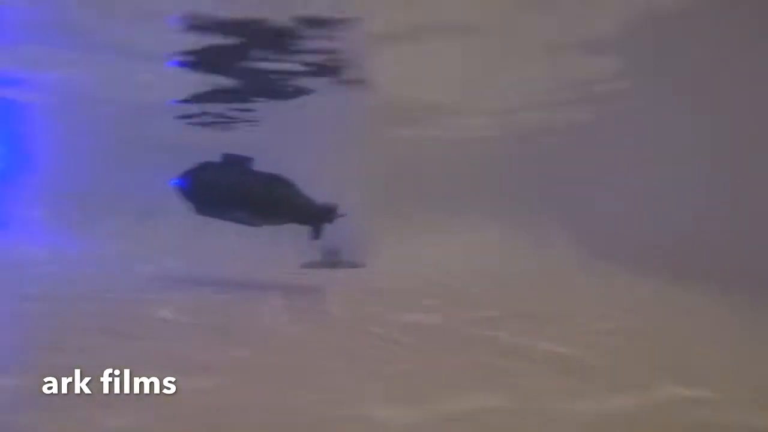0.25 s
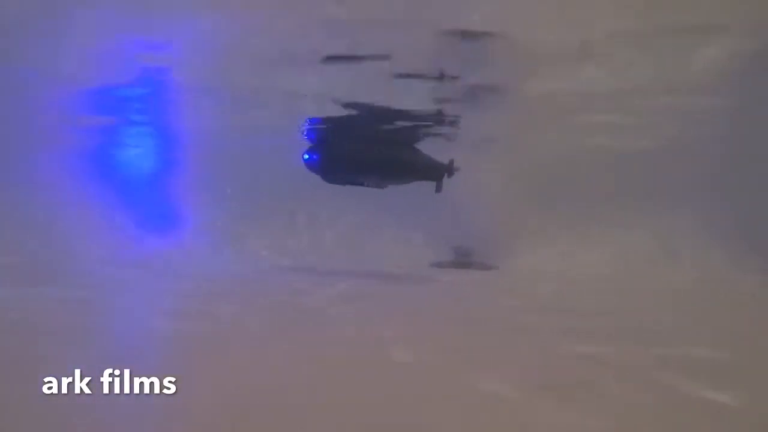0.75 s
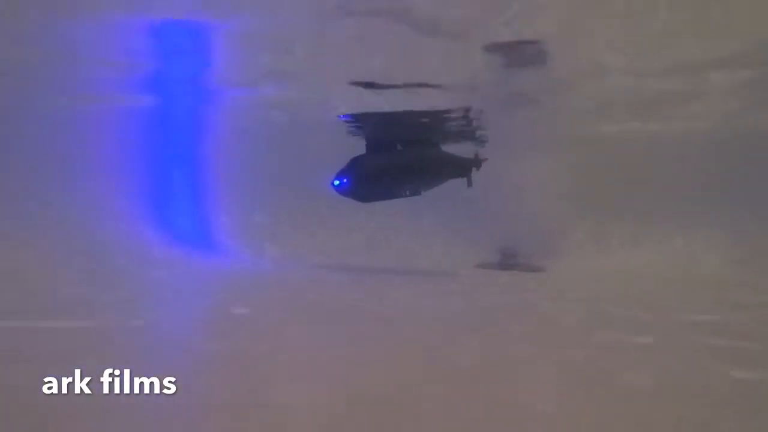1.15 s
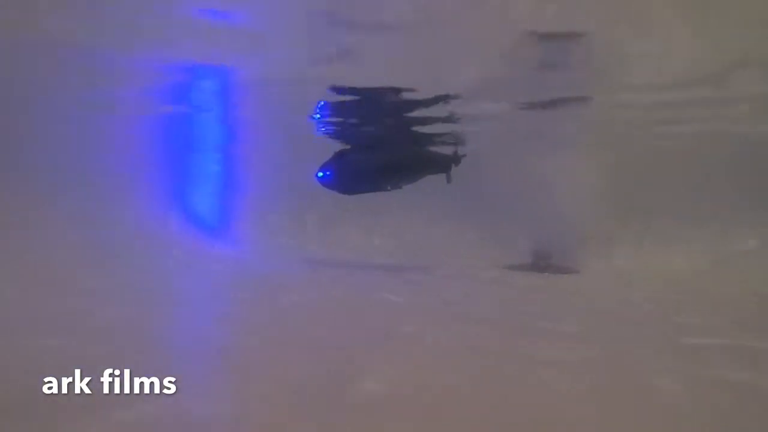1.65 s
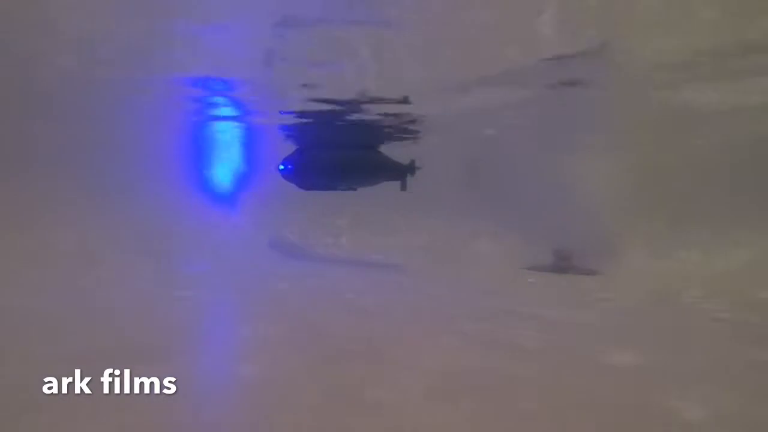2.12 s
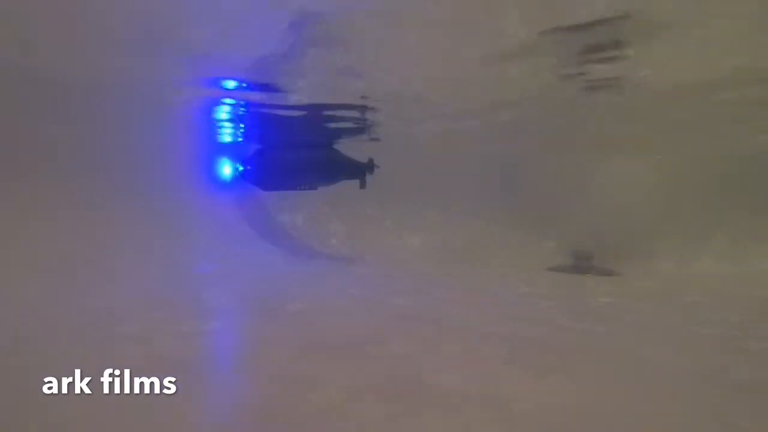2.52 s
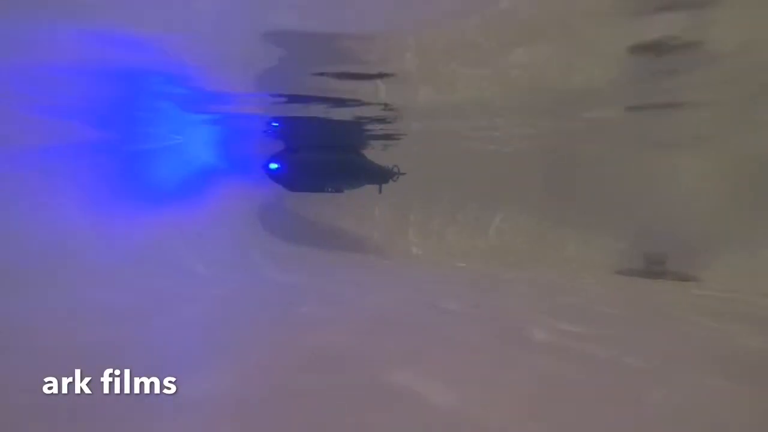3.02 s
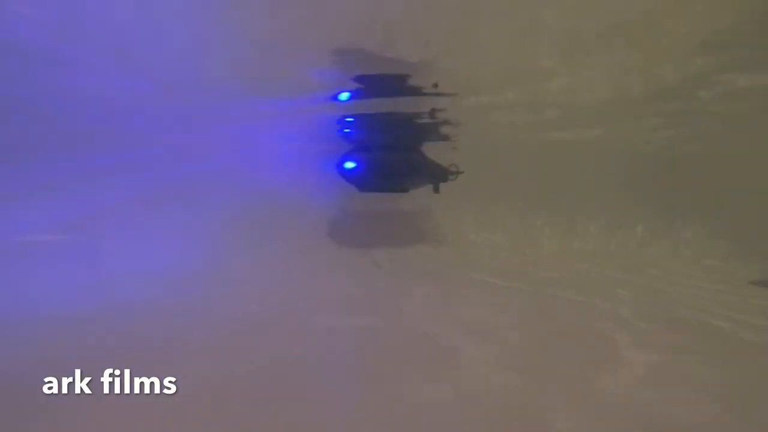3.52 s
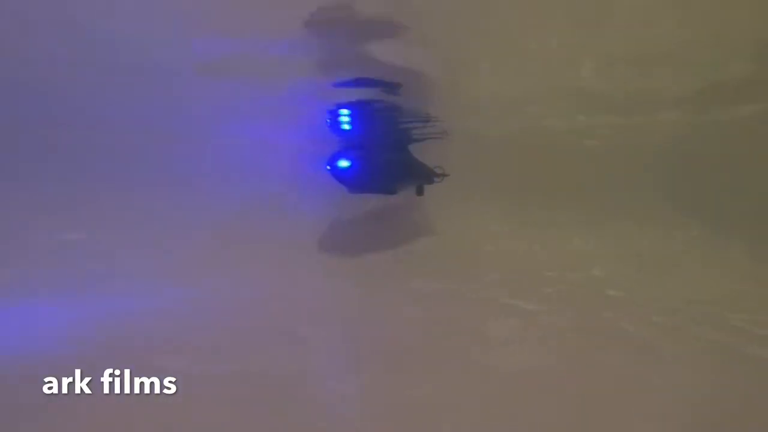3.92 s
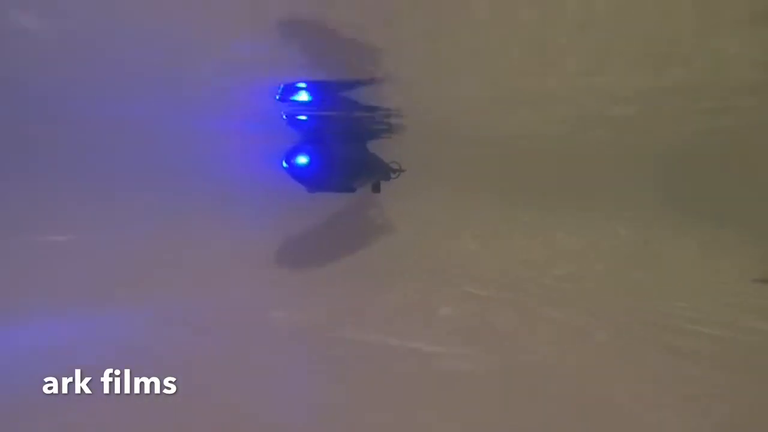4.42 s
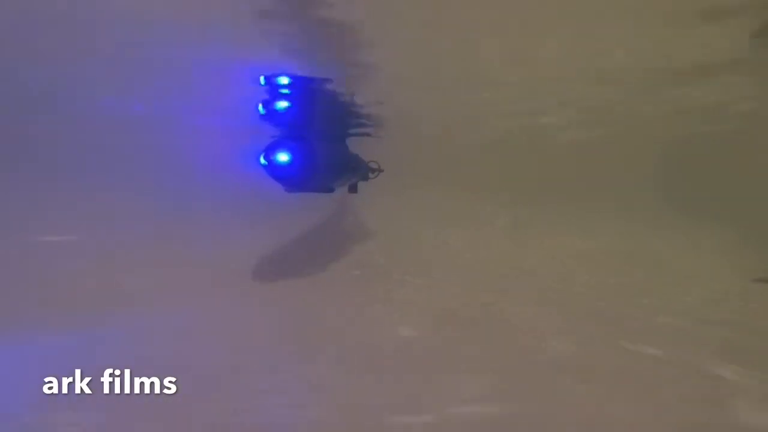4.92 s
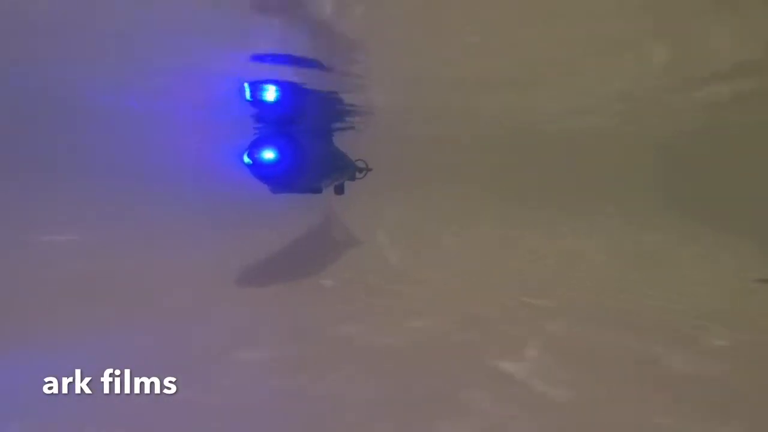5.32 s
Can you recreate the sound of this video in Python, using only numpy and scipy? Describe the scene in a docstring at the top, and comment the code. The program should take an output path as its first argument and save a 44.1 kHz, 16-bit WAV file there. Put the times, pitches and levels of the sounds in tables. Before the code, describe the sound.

Heard from inside a watertight case under a pool's surface, air escapes in a busy gurgle: rising chirps, round pops, dry crackles and soft fizz. After about a second and a half the bubbles stop, leaving murky churning water, low glugs from slapping waves, tiny drips, and the low, uneven hum of a toy submarine's motor.

```python
"""Bubbles around a toy submarine

A toy submarine hums through a swimming pool, heard by two microphones in a watertight case.
Most air bubbles break loose early, right at the case: gliding rings chirp, short rings pop,
and brief noise bursts crackle and fizz. Then coloured noise churns and low rings glug around
the motor, a stack of wavering sine tones. Small drips and thin, very high ticks lie behind."""
import sys
import numpy as np
from scipy import signal
from scipy.fft import rfft, irfft, next_fast_len
from scipy.io import wavfile
from scipy.ndimage import uniform_filter1d, map_coordinates

SR = 44100
rng = np.random.default_rng(int(sys.argv[2]) if len(sys.argv) > 2 else 0)


def master_out(mix):
    """Clip the mix to full scale and print it as 16-bit PCM to the path in sys.argv[1]."""
    frames = np.transpose(np.atleast_2d(mix))
    ceiling = np.clip(frames, -1, 1)
    pcm = np.round(ceiling * 32767).astype(np.int16)
    wavfile.write(sys.argv[1], SR, pcm)


N = 244755
TIME = np.arange(N) / SR
ESCAPE_S = 1.44  # how long air escapes

# bubbles that pinch off and ring briefly: t/s, f/Hz, level/dB
POP_EVENTS = [(0.017, 2570, -29.5), (.062, 1350, -17), (.082, 456, -7.5), (0.099, 1210, -6),
              (0.1483, 993, -5), (.149, 2970, -28), (.198, 2570, -23), (.377, 740, -11.5),
              (0.4315, 967, -16.5), (.433, 2160, -23), (0.521, 1610, -18), (0.612, 1680, -26.5),
              (.63, 604, -11), (.655, 2640, -25), (.678, 496, -10.5), (0.878, 510, -9.5), (0.89, 3000, -24),
              (1.015, 394, -9.5), (1.018, 1470, -21), (1.05, 3270, -17.5), (1.091, 2400, -33),
              (1.311, 3240, -28.5), (1.312, 2250, -30.5), (1.359, 744, -11), (1.36, 2390, -20.5),
              (1.394, 1350, -25)]
# waves slapping in the pool: t/s, level/dB, f/Hz, length of the wash/s, push on the case/dB
WAVES = [(.276, -8, 225, 0.016, -30), (0.299, -20.5, 198, 0.13, -27), (0.431, -9, 267, 0.11, -33),
         (.586, -8, 604, 0.06, -34), (.98, -11.5, 400, 0.085, -31), (1.107, -16.5, 527, 0.035, -49),
         (1.285, -12, 440, 0.064, -36), (1.41, -10, 604, 0.011, -43), (1.633, -13.5, 335, 0.016, -40),
         (1.994, -15, 647, 0.022, -35.5), (2.197, -13, 327, 0.034, -34.5), (2.293, -13.5, 605, 0.011, -29),
         (2.366, -18.5, 293, 0.019, -31), (2.544, -9.5, 535, 0.012, -33), (2.613, -15.5, 398, 0.015, -33),
         (2.74, -14, 432, 0.012, -40), (2.78, -9.5, 578, 0.06, -35), (2.984, -18, 271, 0.041, -39),
         (3.182, -15.5, 410, 0.037, -25.5), (3.285, -5.5, 307, 0.091, -36.5),
         (3.456, -22, 351, 0.09, -29.5), (3.488, -18, 650, .012, -40), (3.626, -13.5, 583, 0.017, -29.5),
         (3.775, -15, 692, 0.028, -36), (3.814, -19.5, 187, 0.14, -39), (3.984, -15, 587, 0.022, -34),
         (4.088, -16, 219, 0.028, -42.5), (4.213, -17.5, 197.4, 0.0072, -34), (4.25, -16, 586, 0.027, -34),
         (4.508, -14, 200, 0.088, -29), (4.617, -15.5, 433, .05, -38), (4.892, -12.5, 646, 0.12, -46),
         (5.093, -9, 612, 0.02, -32.5), (5.215, -14, 478, 0.02, -39), (5.414, -12.5, 580, 0.041, -30)]


def chirps(count=3):
    """Bubbles sing out one by one; each sheds smaller ones that sound beside it, off in pitch."""
    # gliding bubbles; the large late ones are low gulps: t/s, length/s, start f/Hz, end f/Hz, level/dB
    singing = [(0.072, 0.029, 640, 1242, -8.5), (.108, 0.034, 590, 1044, -23),
               (0.11, 0.041, 978, 1540, -27), (.169, 0.079, 274, 844, -7.5), (0.195, 0.028, 873, 1220, -30),
               (0.197, 0.011, 2540, 3540, -34), (0.246, 0.022, 960, 1300, -21),
               (0.375, 0.032, 747, 1200, -11.5), (0.403, 0.016, 1110, 1360, -19),
               (0.422, 0.01, 1190, 1630, -10.5), (0.432, 0.009, 1590, 2350, -29),
               (0.45, 0.01, 2300, 4250, -38), (0.467, 0.017, 1097, 1550, -20),
               (0.485, 0.068, 181.5, 221, -18), (0.635, 0.024, 545, 643, -11),
               (0.649, 0.015, 1000, 1500, -21), (0.68, 0.011, 2380, 3380, -25),
               (0.676, 0.071, 351, 894, -9), (0.681, 0.028, 716, 1356, -13),
               (0.704, 0.038, 1254, 1570, -15.5), (0.741, 0.024, 863, 1150, -18),
               (0.882, 0.083, 293.5, 943, -8.5), (0.971, 0.016, 974, 1350, -18),
               (1.018, 0.017, 777, 1734, -5.5), (1.04, 0.011, 1686, 3030, -26.5),
               (1.031, 0.05, 356, 707, -13.5), (1.034, 0.016, 1160, 1370, -19.5),
               (1.035, 0.018, 1510, 1660, -23.5), (1.051, 0.036, 1606, 1370, -25),
               (1.064, 0.01, 764, 1350, -14.5), (1.069, 0.018, 1253, 1494, -19.5),
               (1.224, 0.054, 668, 1183, -26), (1.299, 0.025, 512, 820, -13),
               (1.306, 0.013, 1400, 1530, -27.5), (1.321, 0.031, 448, 696, -9),
               (1.327, 0.021, 977, 1356, -5.5), (1.362, 0.035, 756, 952, -18),
               (1.424, .01, 1020, 1344, -13.5), (2.194, 0.031, 337, 390, -14.5),
               (2.299, 0.022, 660, 570, -19.5), (2.55, 0.019, 598, 558, -20), (2.604, 0.033, 508, 541, -18),
               (2.656, 0.027, 498, 553, -21), (2.77, 0.023, 540, 615, -17), (3.29, 0.018, 385, 323, -16.5),
               (3.3, 0.029, 178, 204, -21), (3.314, 0.039, 80, 90, -16), (3.392, 0.018, 603, 656, -19),
               (3.655, 0.02, 608, 634, -19), (3.682, 0.022, 656, 668, -15.5),
               (3.809, 0.04, 173.7, 194, -19.5), (3.965, 0.034, 434, 636, -20.5),
               (4.266, 0.024, 630, 670, -22.5), (4.857, 0.019, 636, 653, -17),
               (4.933, 0.042, 651, 610, -18.5), (4.983, 0.021, 605, 628, -20.5),
               (5.035, 0.027, 617, 650, -19)]
    split_db, split_ratio, split_s = -16.5, 1.5, 0.014  # shed bubble: top level, pitch spread, length
    out = np.zeros(N)
    for s, length, start_hz, end_hz, db in singing:
        add(out, s, amp(db) * glide(length, start_hz, end_hz))
        glide_ratio = end_hz / start_hz
        for when, detune in rng.random((count, 2)):
            hz = start_hz * glide_ratio ** when * split_ratio ** (1.506 * detune - 0.5)
            shed = glide(split_s, hz, hz * glide_ratio ** 0.3)
            add(out, s + 0.7 * when * length, amp(db + split_db - 11 * detune) * shed)
    return out


def pops():
    """Bubbles close by ring briefly, each set off by a wet snap of noise."""
    out = np.zeros(N)
    for s, hz, db in POP_EVENTS:
        add(out, s, amp(db) * bubble(hz, cycles=9 + hz / 80, rise=0.31))
        add(out, s, amp(db - 14.5) * puff(hz, ratio=1.35, t60=0.046))
        add(out, s, amp(db - 27) * puff(2200, ratio=1.8, t60=0.0045))
    return out


def gurgle(count=280):
    """Lesser bubbles plip and chirp around the pops; the small ones are higher and weaker."""
    lead_s, trail_s = 0.002, 0.045  # the froth gathers from just before a pop until a while after it
    out = np.zeros(N)
    for which, when, size, strength, kind in rng.random((count, 5)):
        pop_s = POP_EVENTS[int(which * len(POP_EVENTS))][0]
        s = pop_s - lead_s + (lead_s + trail_s) * when ** 1.5
        hz = 650 * 5 ** size
        if kind < 0.85:
            plip = bubble(hz, cycles=16 + hz / 130, rise=0.078)
        else:
            plip = glide(0.0097, hz, 1.17 * hz)
        add(out, s, amp(-24.5 - 12.3 * size - 16.0 * strength) * plip)
    return out


def gushes(count=420):
    """A cloud of very small rising bubbles swells and thins out, and shoves the water at the case."""
    # gushes of fine air hissing out: t/s, length/s, level/dB
    gush_rows = [(0.206, 0.21, -33), (0.271, 0.098, -36.5), (0.369, 0.13, -41.5), (0.498, 0.14, -45.5),
                 (0.675, 0.03, -41), (1.01, 0.029, -40)]
    # colour of the fizz: f/Hz, level/dB
    fizz_colour = [(500, -20), (900, 7), (1600, 7), (2000, -0.5), (2900, 3), (3300, -9.5), (4200, -19),
                   (6000, -30), (15000, -52.5)]
    # colour of the shove: f/Hz, level/dB
    shove_colour = [(15, -12.5), (55, 13), (90, -5), (150, -9.5), (260, -10.5), (600, -34), (2000, -120)]
    air, cloud = np.zeros(N), np.zeros(N)
    for s, length, db in gush_rows:
        add(air, s, amp(db) * signal.windows.tukey(int(length * SR), 0.7))
    for when, size in rng.random((count, 2)):
        hz = 1200 * 2.45 ** size
        add(cloud, when * ESCAPE_S, amp(-3 - 6 * size) * glide(0.011, hz, 1.14 * hz))
    fizz = amp(-4.0) * coloured(sparks(rate=3300, spread_db=4.5), fizz_colour)
    shove = amp(6.0) * coloured(rng.standard_normal(N), shove_colour)
    return air * (fizz + cloud + shove)


def crackle(count=380, spatter_count=2):
    """Tiny bubbles burst on the case: a dry crack, a brief wet ring, and a spatter after the listed ones."""
    # the listed bursts: t/s, level/dB, f/Hz
    bursts = [(0.0172, -27, 4560), (0.062, -37, 3470), (.0775, -31, 8670), (.0902, -41, 3450),
              (.176, -32, 4100), (0.2389, -32.5, 4570), (.325, -30, 5870), (.34, -33.5, 8660),
              (.3576, -38, 4260), (.378, -34.5, 4600), (0.4168, -33.5, 4240), (0.433, -35.5, 6100),
              (0.4792, -26.5, 7000), (0.5524, -37.5, 6140), (0.6522, -34, 4120), (0.6894, -22, 4800),
              (0.7, -24, 5770), (.8006, -37, 5520), (0.912, -36, 7150), (.9433, -30.5, 4520),
              (1.0425, -36.5, 7700), (1.0509, -22, 5200), (1.0616, -26.5, 4460), (1.0894, -30, 4560),
              (1.1214, -37.5, 6000), (1.1438, -39, 6460), (1.2236, -33, 8600), (1.2441, -33.5, 4680),
              (1.2615, -30.5, 9900), (1.27, -25, 4330), (1.3078, -30.5, 6180), (1.323, -31, 7440),
              (1.4255, -40.5, 5490), (1.8781, -44.5, 3910), (2.6398, -45, 5130), (4.4092, -46, 6500),
              (4.4676, -48.5, 3640), (5.215, -44, 4830)]
    # colour of all the bursts: f/Hz, level/dB
    burst_colour = [(600, -17), (1500, 10), (3000, 11), (4500, 2.5), (6000, 4), (8000, 1.5), (11000, -2),
                    (15500, -13.5)]
    weakest_db, range_db = -55.5, 17.5  # random bursts while the air escapes
    spatter_s, spatter_db = 0.024, -12  # smaller bubbles burst within this time, at most this strong
    out = np.zeros(N)
    weak = [(ESCAPE_S * when, weakest_db + range_db * size ** 2, 3100 * 3.7 ** pitch)
            for when, size, pitch in rng.random((count, 3))]
    for s, db, hz in list(bursts) + weak:
        add(out, s + 0.0011, amp(db - 4.5) * puff(1.4 * hz, ratio=3.6, t60=0.0046))
        add(out, s + 0.001, amp(db - 9.0) * bubble(hz, cycles=63, rise=0.12))
        add(out, s + 0.0026, amp(db - 20) * puff(4200, ratio=2.0, t60=0.031))
    for s, db, hz in bursts:
        for late, detune in rng.random((spatter_count, 2)):
            droplet = puff(1.1 * hz * 2 ** (detune - 0.5), ratio=1.5, t60=0.009)
            add(out, s + spatter_s * late, amp(db + spatter_db - 6 * late) * droplet)
    return filtered(out, lambda hz: amp(along(burst_colour, hz)))


def pool(x):
    """The surface and the walls send the bubbles back as a short, dull tail."""
    tail = puff(790, ratio=1.94, t60=0.12)
    delayed = np.pad(tail, (SR // 250, 0))  # 4 ms late
    return signal.fftconvolve(x, delayed / np.abs(rfft(tail)).max())[:N]


def glugs(count=3):
    """A wave slaps a few times quickly, rings low, and rolls briefly between the pool's walls."""
    slosh_s, loss_db = 0.007, 6.5  # it slaps again after about this long, weaker each time
    out = np.zeros(N)
    for s, db, hz, _, _ in WAVES:
        add(out, s + 0.0019, amp(db - 2) * bubble(hz, cycles=4 + hz / 90, rise=0.17))
        for k, (late, detune) in enumerate(rng.uniform(-1.05, 1, (count, 2)), 1):
            slap = bubble(hz * 1.29 ** detune, cycles=9.6, rise=0.18)
            add(out, s + 0.00204 + slosh_s * (k + 0.37 * late), amp(db - loss_db * k) * slap)
        add(out, s + 0.00426, amp(db - 19.5) * puff(hz, ratio=1.9, t60=0.073))
    return filtered(out, lambda hz: 1 / (1 + (hz / 1050) ** 8))


def pushes():
    """While its wash lasts and a little after, each wave leans on the case with a low rumble."""
    # colour of the push: f/Hz, level/dB
    push_colour = [(12, -13.5), (30, -7), (75, 3), (120, -3), (200, -2.5), (400, -25), (1000, -94)]
    force = np.zeros(N)
    for s, _, _, length, push_db in WAVES:
        add(force, s, amp(push_db) * swell(attack_s=0.021, hold_s=length, t60=0.21))
    return force * coloured(rng.standard_normal(N), push_colour)


def flow():
    """How hard the water moves, in dB: a slowly varying stir, and a wash that grows with each wave's slap."""
    # stir of the water under the waves, before the offset below: t/s, level/dB
    stir = [(0.0, -25.5), (0.15, -22.5), (0.28, -25.5), (0.65, -23.5), (1.74, -28), (2.67, -25.5),
            (2.83, -29), (3.06, -26), (3.36, -26), (3.88, -28.5), (4.06, -30.5), (4.3, -26.5), (5.09, -29),
            (5.24, -29.5), (5.55, -27)]
    stir_offset_db = -1.53
    wash_db, middling_db = -26, -12  # the wash of a middling wave, and the slap level of such a wave
    wash_grows = 0.078  # dB of wash per dB of slap
    stir_db, = curves(stir)
    power = amp(stir_db + stir_offset_db) ** 2
    for s, db, _, length, _ in WAVES:
        wash = amp(wash_db + wash_grows * (db - middling_db)) * swell(0.0043, length, t60=0.12)
        add(power, s, wash ** 2)
    return 10 * np.log10(power)


def water():
    """Flow is a deep surge, a churn of countless soft bubbles and a thin fizz, over a steady hiss."""
    # colours of the four layers, each: f/Hz, level/dB
    surge_colour = [(12, -18.5), (29, 2.5), (45, -5.5), (70, -2), (105, 5.5), (140, -2), (180, 8),
                    (230, -1), (300, -6), (600, -61.5), (2000, -120)]
    churn_colour = [(130, -62.5), (250, 0.5), (420, 0), (470, -0.5), (520, 0.5), (650, 2), (760, -5),
                    (930, -9.5), (1020, -13.5), (1130, -38), (1600, -54.5), (3000, -65.5)]
    fizz_colour = [(600, -5.5), (1150, 7), (1500, 9), (1740, 12), (1900, 3.5), (2300, -0.5), (2800, 2),
                   (3500, -9), (3900, -14), (4400, -26.5), (7000, -37), (15500, -62.5)]
    hiss_colour = [(2000, 0), (4500, 1.5), (7000, -1), (9500, -10), (13500, -13), (15500, -36.5)]
    # fine bubbles in the water, before the fizz offset: t/s, level/dB
    foam = [(0.0, -49), (0.31, -48.5), (0.76, -50), (1.76, -53), (3.51, -48.5), (3.97, -52), (4.71, -50.5),
            (5.55, -51.5)]
    surge_db, churn_db, fizz_db = -4, -0.37, 5.5  # surge and churn against the flow, fizz against foam
    flow_db = flow()
    foam_db, = curves(foam)
    mean_db = flow_db.mean()
    stirring_db = flow_db - uniform_filter1d(flow_db, SR // 2)  # a harder churn also fizzes more
    lapping = wobble(45)

    surge_level = mean_db + surge_db + (flow_db - mean_db) + 1.4 * lapping + 1.9 * wobble(13)
    surge = coloured(rng.standard_normal(N), surge_colour) * amp(surge_level)
    soft_bubbles = coloured(sparks(rate=1500, spread_db=1.5), churn_colour)
    churn = lumpy(soft_bubbles, depth_db=3, size=512) * amp(flow_db + churn_db + 1.2 * lapping)
    fine_bubbles = coloured(sparks(rate=4000, spread_db=0.5), fizz_colour)
    fizz_level = foam_db + fizz_db + 0.4 * stirring_db + 0.8 * lapping + wobble(70)
    fizz = lumpy(fine_bubbles, depth_db=4, size=256) * amp(fizz_level)
    hiss = amp(-67.0) * coloured(rng.standard_normal(N), hiss_colour)
    return surge + churn + fizz + hiss


def standing(x):
    """Standing waves of the pool and the case lift a few low pitches above the rest."""
    # resonances: f/Hz, width/Hz, boost/dB
    resonances = [(248.2, 27, 5.5), (295, 16, 6), (359.5, 25, 5), (425, 33.5, 7), (517, 49, 4.5)]
    floor = [(200, 1), (235, -4.5), (570, -2.5), (620, 0)]  # level between them: f/Hz, level/dB

    def response(hz):
        peaks_db = sum(db / (1 + (2 * (hz - centre) / width) ** 2) for centre, width, db in resonances)
        return amp(along(floor, hz) + peaks_db)
    return filtered(x, response)


def motor():
    """The shaft turns a little unevenly; ripples overhead make each of its orders fade in and out."""
    # tones of the shaft, before the fading: multiple of the shaft rate, level/dB
    orders = [(1, -35), (2, -33), (3, -40.5), (4, -54)]
    shaft_hz = 94.8 * (1 + 0.01192 * wobble(5) + 0.0296 * wobble(35))
    phase = 2 * np.pi * np.cumsum(shaft_hz) / SR
    hum = np.zeros(N)
    for order, db in orders:
        hum += amp(db - 4 + 2.9 * np.tanh(wobble(9.9))) * np.sin(order * phase)
    # the gears rattle a resonance of the hull, whose pitch wanders as the water moves around it
    rattle = unit(filtered(rng.standard_normal(N), lambda hz: 1 / (1 + (hz / 32) ** 2)))
    hull_hz = 635 * (1 + 0.04 * wobble(12))
    hull = rattle * np.sin(2 * np.pi * np.cumsum(hull_hz) / SR)
    nearness_db = np.interp(TIME, [1.5, 3.8], [-2.5, 1])  # the boat turns towards the microphones
    return amp(nearness_db) * (hum + amp(-35 + 2.9 * wobble(14)) * hull)


def drips(count=130):
    """Small drips far off, each a snap and a short ring with a damp tail, among many fainter ones."""
    # the clearer drips: t/s, level/dB, f/Hz
    clear_drips = [(1.671, -32.5, 2580), (2.2, -24.5, 1620), (2.37, -26, 1560), (2.783, -29, 1760),
                   (3.186, -22, 1350), (3.312, -32, 1750), (3.53, -30, 1650), (3.531, -32, 2840),
                   (3.783, -24.5, 1400), (3.788, -30, 1790), (3.898, -25, 1300), (4.124, -23.5, 1870),
                   (4.4676, -26.5, 3240), (4.659, -33, 1600), (4.892, -29.5, 2010), (5.058, -30, 2650),
                   (5.2224, -26.5, 2800), (5.408, -28, 1910)]
    out = np.zeros(N)
    faint = [(when * N / SR, -44 + 9 * size ** 2 - 4 * pitch, 1350 * 2.1 ** pitch)
             for when, size, pitch in rng.random((count, 3))]
    for s, db, hz in list(clear_drips) + faint:
        add(out, s + 0.00087, amp(db - 5) * bubble(hz, cycles=25, rise=0.062))
        add(out, s + 0.001198, amp(db - 9.0) * puff(hz, ratio=1.135, t60=0.051))
        add(out, s + 0.001, amp(db - 9.0) * puff(hz, ratio=1.28, t60=0.0088))
    return out


def trills():
    """Very high, thin ticks, each a narrow burst of noise, come in short, even trains."""
    # faint trains of ticks: t/s, length/s, level/dB
    trains = [(2.029, .1, -53), (2.821, .01, -52.5), (2.962, .045, -49.5)]
    gap_s, tick_hz = 0.0176, 11600  # from tick to tick, and their pitch
    out = np.zeros(N)
    for s, length, db in trains:
        for late in np.arange(0, length, gap_s):
            add(out, s + late, amp(db - 2) * puff(tick_hz, ratio=1.13, t60=0.011))
    return out


def glide(length, start_hz, end_hz):
    """A bubble of peak about 1 swells and fades while its pitch moves by a steady ratio, wavering a little."""
    crest_share, swell_db, fade_db = 0.65, 6, 10.5  # where it is loudest; its swell before, its fade after
    waver, waver_at_hz = 0.025, 1200  # pitch waver of a bubble that starts here; higher ones waver more
    u = np.linspace(0, 1, int(length * SR))

    def tremble(rate):
        return map_coordinates(rng.standard_normal(64), [u * length * rate], mode="mirror")
    depth = waver * min(start_hz / waver_at_hz, 2)
    hz = start_hz * (end_hz / start_hz) ** u * (1 + depth * tremble(261))
    phase = 2 * np.pi * np.cumsum(hz) / SR
    level_db = np.interp(u, [0, crest_share, 1], [-swell_db, 0, -fade_db])
    envelope = amp(level_db + 1.7 * tremble(221)) * signal.windows.tukey(len(u), 0.18)
    return envelope * (np.sin(phase) + amp(-43.5) * np.sin(2 * phase))


def bubble(hz, cycles, rise):
    """A ring of peak 1 dies by 60 dB in so many cycles of hz while its pitch rises by the share rise."""
    life = cycles / hz
    t = np.arange(int(life * SR) + 2) / SR
    tone = np.sin(2 * np.pi * hz * t * (1 + rise * t / life / 2))
    ring = tone * np.exp(-np.log(1000) * t / life) * (1 - np.exp(-2 * t * hz))
    return ring / np.abs(ring).max()


def puff(hz, ratio, t60):
    """Noise from hz / ratio to hz * ratio, rms 1 before its envelope, rises in about a cycle and dies in t60."""
    t = np.arange(int(t60 * SR) + 2) / SR
    ratio = max(ratio, 1.05)
    edges = np.clip([hz / ratio, hz * ratio], 30, SR * 0.45)
    band = signal.butter(3, edges, "band", fs=SR, output="sos")
    noise = signal.sosfilt(band, rng.standard_normal(len(t) + SR // 20))  # the filter settles first
    return unit(noise[-len(t):]) * amp(-60 * t / t60) * (1 - np.exp(-(t * hz) ** 2))


def swell(attack_s, hold_s, t60):
    """An envelope of half a second at most that rises, holds and dies away."""
    t = np.arange(SR // 2) / SR
    return (1 - np.exp(-t / attack_s)) * amp(-60 * np.maximum(t - hold_s, 0) / t60)


def sparks(rate, spread_db):
    """Impulses at random times, about rate a second, and of scattered sizes; rms 1."""
    hit = rng.random(N) < rate / SR
    size = amp(spread_db * np.clip(rng.standard_normal(N), -2, 2))
    return unit(hit * size * np.sign(rng.standard_normal(N)))


def lumpy(x, depth_db, size):
    """x broken into lumps: patches of pitch swell and fade on their own, some 20 ms at a time; rms 1."""
    z = signal.stft(x, nperseg=size)[2]
    field = uniform_filter1d(rng.standard_normal(z.shape), 3, 0)  # smooth over pitch
    field = uniform_filter1d(field, 2048 // size, 1)  # smooth over time
    gain = amp(depth_db * np.tanh(unit(field)))
    return unit(signal.istft(z * gain, nperseg=size)[1][:N])


def coloured(x, spectrum):
    """x with the given colour, at rms 1."""
    return unit(filtered(x, lambda hz: amp(along(spectrum, hz))))


def filtered(x, response):
    """x times a response of frequency."""
    m = next_fast_len(N + SR // 2)
    return irfft(rfft(x, m) * response(np.fft.rfftfreq(m, 1 / SR)), m)[..., :N]


def along(points, hz):
    """(f/Hz, value) points read on a log axis."""
    f, v = np.transpose(points)
    return np.interp(np.log(hz + 1), np.log(f + 1), v)


def curves(rows):
    """One value per sample for each column after the time."""
    s, *cols = np.transpose(rows)
    return [np.interp(TIME, s, c) for c in cols]


def wobble(rate):
    """A smooth random curve with rate knots a second."""
    return map_coordinates(rng.standard_normal(int(N * rate / SR) + 4), [TIME * rate])


def add(track, s, sound):
    """Mix a sound into the track at s seconds."""
    start = int(np.clip(round(s * SR), 0, N - 1))
    track[start:start + len(sound)] += sound[:N - start]


def amp(db):
    """Decibels to gain."""
    return 10 ** (np.asarray(db) / 20)


def unit(x):
    """Scale to rms 1."""
    return x / np.sqrt(np.mean(x ** 2) + 1e-20)


def scene():
    """The pool reaches both microphones alike; the close bubbles differ in phase between them."""
    # difference of the close bubbles between the two microphones: f/Hz, side level/dB
    width = [(200, -46), (700, -33.5), (1300, -19), (2400, -18), (4400, -9.5), (8000, -2), (15000, 9.5)]
    close = chirps() + pops() + gurgle() + gushes() + crackle()
    moving_water = standing(glugs() + water()) + pushes()
    mid = close + amp(-9.0) * pool(close) + moving_water + motor() + drips() + trills()
    # a quarter-cycle shift, whose size and direction wander
    side = filtered(close * wobble(70), lambda hz: 1j * amp(along(width, hz)))
    return np.array([mid + side, mid - side])


def record(dry):
    """Peaks clip at full scale, then nothing is kept above the band limit."""
    top_hz = 15750
    return filtered(np.clip(dry, -1, 1), lambda hz: hz < top_hz)


dry = scene()
out = record(dry)
master_out(out)
```